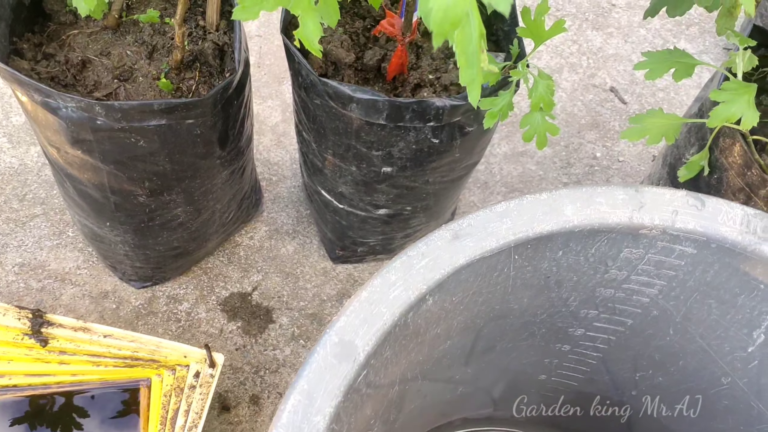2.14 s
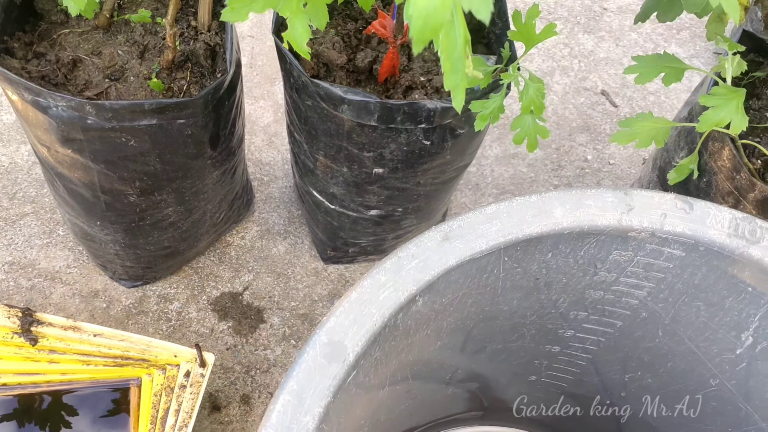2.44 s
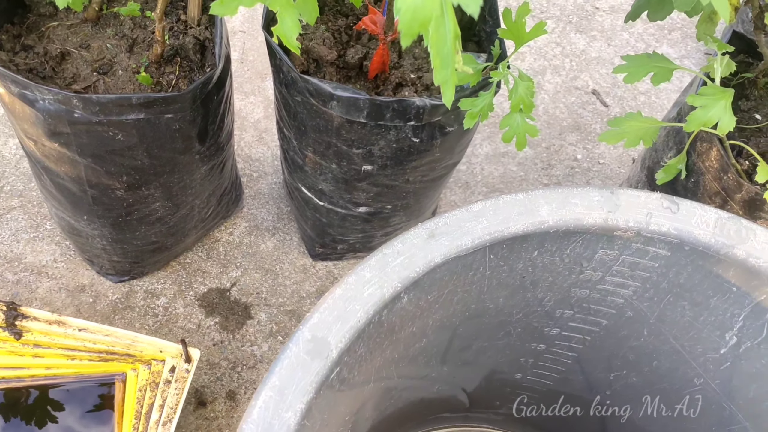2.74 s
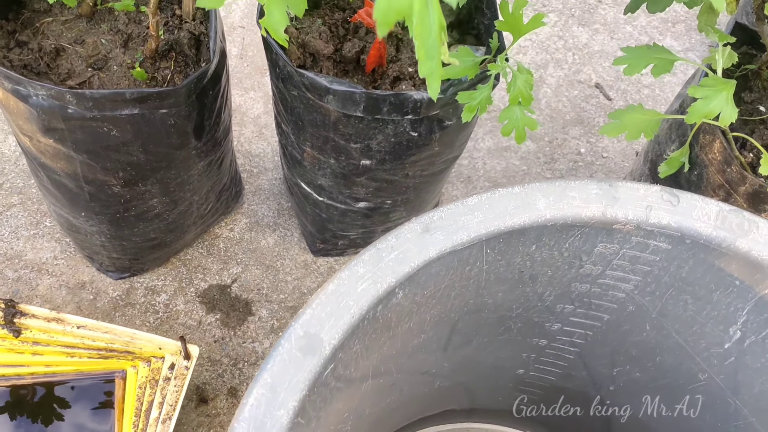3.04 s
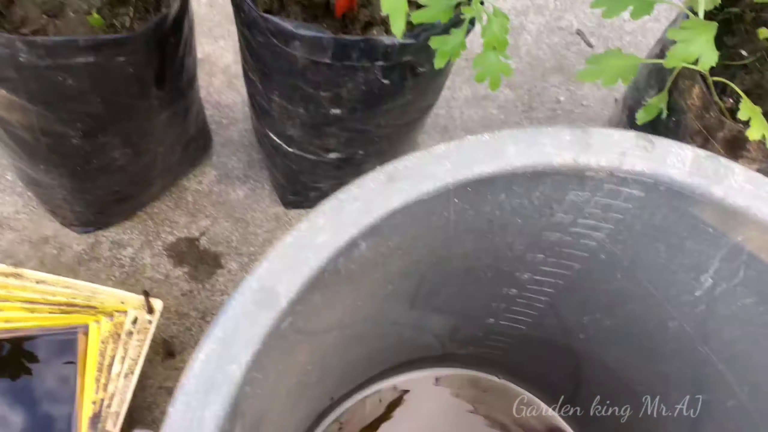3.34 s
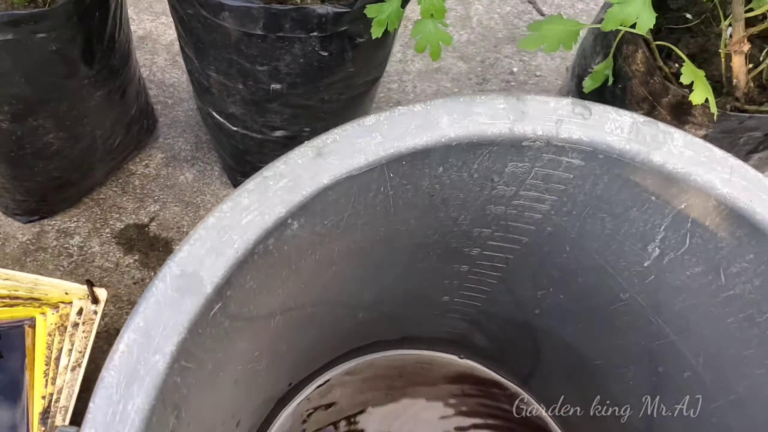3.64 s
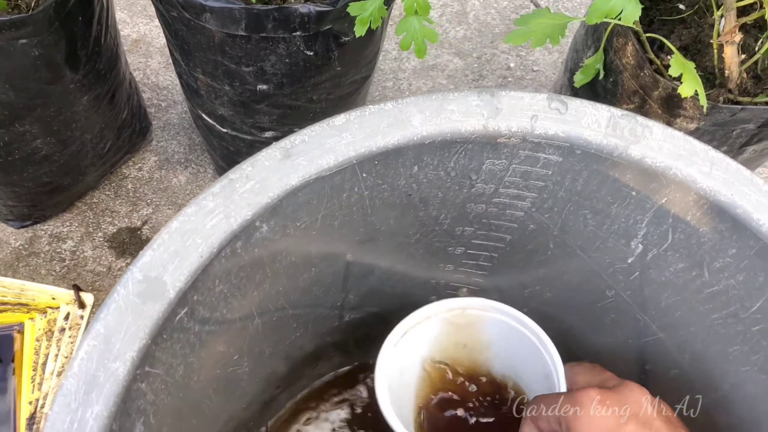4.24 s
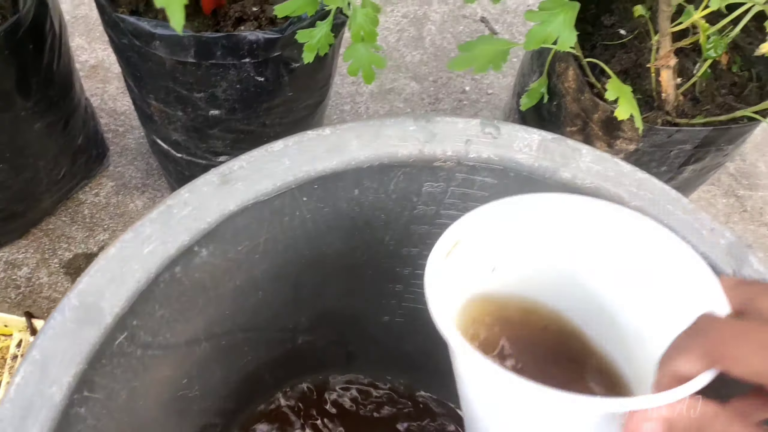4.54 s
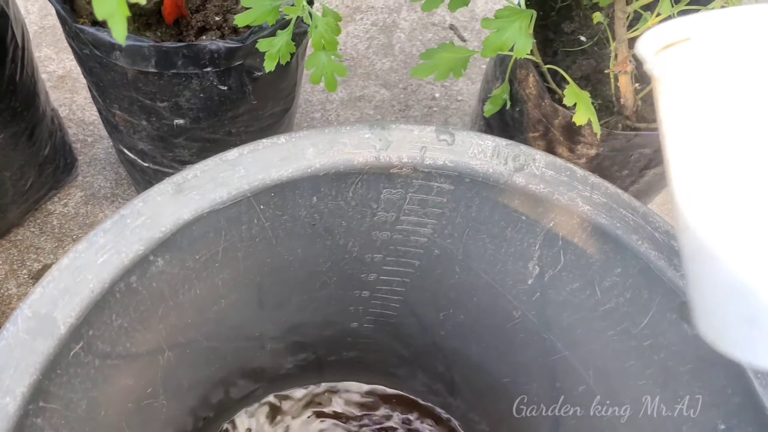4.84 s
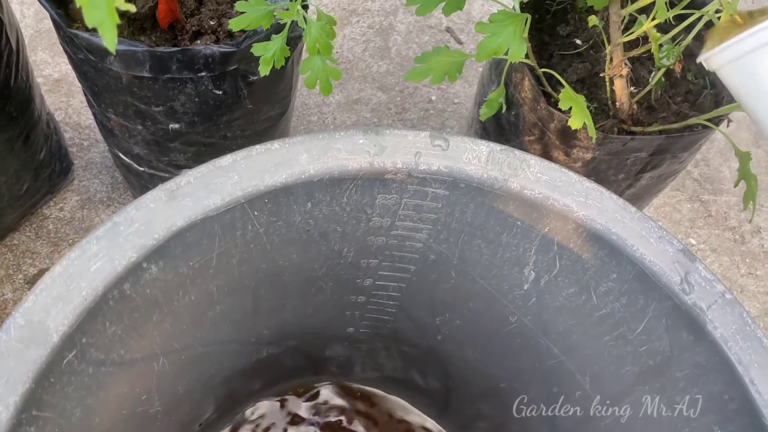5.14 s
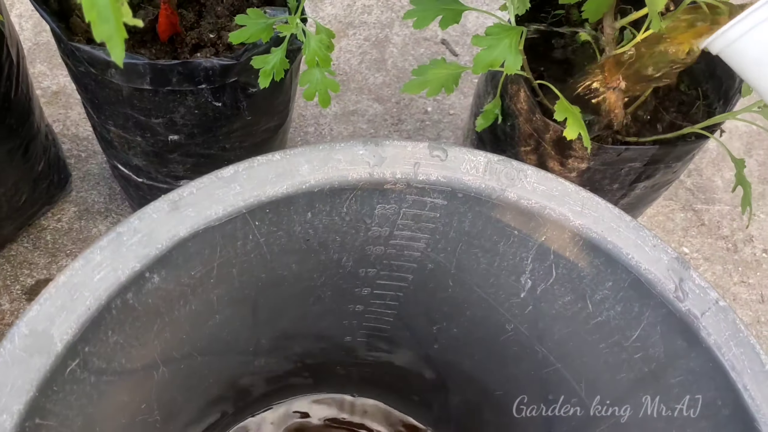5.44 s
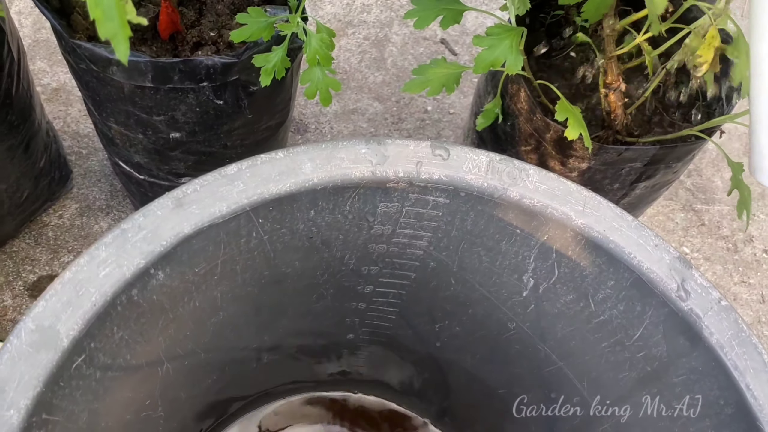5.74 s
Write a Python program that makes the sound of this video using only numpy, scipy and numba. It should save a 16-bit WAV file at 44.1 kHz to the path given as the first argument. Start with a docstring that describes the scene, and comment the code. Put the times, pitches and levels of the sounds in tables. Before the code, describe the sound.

In a quiet garden, close to the microphone, liquid splashes softly onto earth, a plastic cup rubs and taps a bucket, and a second little pour follows. Next comes the loudest part: the cup scoops in the metal bucket, knocking and sloshing with a low hollow boom, and drops fall back. A last fizzing pour hits the soil. Faint birds chirp and whistle in the background.

```python
"""Liquid plant feed is poured onto potted soil from a plastic cup, scooped out of a metal bucket.
Each short pour fizzes with tiny bursting bubbles while fat drops smack the earth. Between pours the cup
rubs, knocks and plunges in the bucket: the liquid sloshes, the metal booms and rings, and drips fall back.
Behind it all, birds whistle and chirp over the hush of a very quiet garden."""
import sys
import numpy as np
from scipy import signal
from scipy.fft import rfft, irfft
from scipy.io import wavfile
from scipy.ndimage import uniform_filter1d
from numba import njit

SR = 44100
rng = np.random.default_rng(int(sys.argv[2]) if len(sys.argv) > 2 else 0)


def persist_wave(psi):
    """Save psi, clipped to +-1, as 16-bit WAV."""
    counts = np.round(np.clip(psi, -1, 1) * 32767).astype(np.int16)
    wavfile.write(sys.argv[1], SR, np.atleast_2d(counts).T)


N = 254898
T = np.arange(N) / SR

# Tone curves say how strong the low and high parts of a sound are.
# Each row: frequency in Hz, level in dB. Levels in all tables are relative.
YARD_TONE = [(15, -31), (25, -10), (48, -8.5), (125, 1.5), (237, -9), (978, -17), (1540, -22), (3260, -25),
             (3630, -27.5), (4260, -28.5), (5280, -35), (9520, -30), (15000, -34.5)]
RUB_TONE = [(1200, -23), (1550, -11), (1750, -16), (1970, 1.5), (2500, -16), (3900, -2), (5500, -12.5),
            (7000, -9), (9000, -25)]
SLOSH_TONE = [(200, -30.5), (400, -23), (560, -10.5), (760, -8), (900, -11.5), (1260, -7.5), (1900, -10),
              (2300, -7), (2900, -7), (3700, -5), (5000, -12), (6000, -20), (9000, -36.5)]
SPRAY_TONE = [(3000, 2), (5500, -10.5), (8000, -6), (11000, -9), (15000, -5)]
RUMBLE_TONE = [(25, -28.5), (60, -22), (110, -9.5), (170, -1.5), (215, -1), (260, -7), (300, -3.5),
               (380, -21.5), (600, -46.5)]
SLAP_TONE = [(30, -41), (120, -25), (200, -19), (380, -16.5), (520, -2.5), (700, 1.5), (1200, -1),
             (1900, -6), (3400, -10.5), (4800, -21), (6000, -31.5), (15000, -54)]
SPATTER_TONE = [(800, -22.5), (2300, -2.5), (3500, 5.5), (5000, -3.5), (6000, -4.5), (8300, -4),
                (11000, -10.5), (15000, -13.5)]
SMACK_TONE = [(500, -44), (1200, -39.5), (2200, -15), (4000, -4), (8000, 0), (14000, 3.5)]
FIZZ_TONE = [(2060, -15), (3500, -12), (4460, -3.5), (5620, -4.5), (6050, 2), (8160, 5), (12000, 8),
             (14100, 14), (15000, 11), (15500, -51)]
PUDDLE_TONE = [(700, -14), (1400, -1), (1900, 6), (3200, 7), (4500, 12.5), (6000, 7.5), (9000, -12.5)]

# A small bird's chirps. Each row: start in seconds, level in dB.
CHIRPS = [(1.115, -54.5), (1.287, -54.5), (1.459, -54), (1.643, -57), (1.877, -63), (2.852, -66.5),
          (3.069, -55), (3.518, -51), (3.725, -48), (4.561, -51.5), (4.795, -55), (5.06, -63)]
# Far birds. Each row: start and length in seconds, first and last pitch in Hz, level in dB.
FAR_CALLS = [(0, 0.076, 622, 713, -58), (0.261, .18, 630, 728, -59), (0.711, .08, 503, 543, -62),
             (1.055, 0.076, 704, 619, -50.5), (1.072, .08, 937, 851, -58), (1.062, 0.094, 1540, 1462, -60),
             (2.46, .13, 1970, 1975, -60), (2.521, .18, 2424, 2405, -66), (2.51, .11, 3500, 3336, -63),
             (2.5, .08, 1038, 940, -66), (2.917, .28, 3280, 3290, -61), (3.215, 0.077, 3298, 3250, -50),
             (3.075, 0.034, 1036, 985, -61), (3.17, .14, 4680, 4780, -67), (4.635, .09, 1107, 1184, -49.5),
             (4.722, 0.079, 1680, 1617, -56.5), (4.937, .14, 701.4, 637.6, -56),
             (5.025, .06, 3290, 3270, -64), (5.073, .1, 1330, 1397, -57.5), (5.137, 0.095, 653, 708, -56),
             (5.24, .11, 1108, 1134, -50), (5.338, .07, 1702, 1590, -47.5), (5.22, .12, 1450, 1427, -58),
             (5.36, .13, 1427, 1404, -50), (5.32, .06, 3400, 3210, -65), (5.366, .22, 704, 713.3, -53),
             (5.677, 0.12, 1450, 1585, -52)]
# The notes of the bucket's air and walls. Each row: pitch in Hz, level in dB, ring time in seconds.
BUCKET_NOTES = [(208, -10, 0.12), (292, -11.5, 1), (586, 0.5, 0.23), (632, -4, .12), (752, 0.5, 0.097),
                (925, -6.5, 0.1), (1084, 1.5, .13), (1290, 0, .2), (1435, -4, 0.069), (1660, 1.5, 0.072),
                (2030, -18, .17), (2174, -5, 0.11), (2610, -8, 0.35), (2839, -13, .18), (3100, -12, 0.11),
                (3380, -7.5, .12), (3474, -7, .14), (3660, -5, 0.24)]
# The deep notes of its base. Each row: pitch in Hz, level in dB, ring and swell times in seconds.
BOOM_NOTES = [(216.9, 1.5, 0.12, 0.01), (304, -15, 0.11, .004), (122, -24.5, 0.12, .004)]
# Lone bubbles and drips. Each row: start in seconds, pitch in Hz, level in dB, ring time in seconds.
LONE_DRIPS = [(3.361, 2166, -18, .06), (3.385, 2130, -14, .035), (3.390, 1407, -19, 0.035),
              (3.603, 530, -5, 0.05), (3.622, 672, -8.5, 0.037), (4.444, 2490, -19.5, .011),
              (4.524, 1280, -13.5, 0.015), (4.524, 1890, -13.5, 0.005), (4.598, 2040, -38.5, .062),
              (4.654, 553, -19, 0.037), (4.649, 344, -34, 0.072), (4.735, 503, -28, 0.03),
              (4.779, 2950, -25, 0.018), (4.778, 5050, -42, .012)]
# Drops flung at the cup and bucket. Each row: start in seconds, level in dB, pitch in Hz.
FLUNG_DROPS = [(3.343, -8.5, 8740), (3.344, -10, 3520), (3.461, -23, 7450), (4.044, -8, 4870),
               (4.0445, -5, 9520), (4.089, -12, 11850), (4.418, -26, 4550), (4.472, -17, 12500),
               (4.524, -27, 3800)]
# The cup stirs. Each row: start and hold in seconds, then slosh, spray and rumble levels in dB.
CUP_STIRS = [(0.962, 0.07, -54, -78, -55), (3.287, 0.22, -31.5, -36, -43), (3.612, .06, -52, -66, -48),
             (4.015, 0.27, -26, -38.5, -35), (4.34, 0.049, -35.5, -38, -38)]
# The cup hits the bucket or the liquid. Each row: start in seconds, slap, spatter and boom levels
# in dB, pitch of the cup's hollow note in Hz, rise time in seconds.
CUP_HITS = [(0.958, -14.5, -62, -24, 760, .0015), (0.989, -22, -43, -53, 567, .001),
            (3.2785, -1.5, -17, -19, 677, .001), (3.284, -3, -19, -10, 601, 0.0011),
            (3.572, -21, -27, -46, 572, .022), (3.602, -5, -21, -32, 570, .004),
            (3.61, -7, -17, -23, 573, .002), (3.622, -14, -33, -20.5, 596, .0015),
            (3.936, -5.5, -19, -30, 571, .007), (3.952, -2.5, -14, -42, 700, .007),
            (3.968, -.5, -10.5, -21, 576, .005), (3.994, -3.5, -3.5, -10.5, 605, 0.0014),
            (4.003, -7, -9, -7, 556, 0.00083), (4.019, -4.5, -20, -9, 606, .001),
            (4.155, -10.5, -30, -16, 676, 0.01), (4.178, -10.5, -21, -29.5, 750, .008),
            (4.281, 0, -8.5, -24, 564, 0.0038), (4.311, -12, -25, -40, 779, 0.0014),
            (4.353, -9, -19.5, -17, 567, 0.0048)]
# Pours onto the soil. Each row: start and hold in seconds, level in dB.
SOIL_POURS = [(-.03, .08, -46), (.136, .29, -44), (1.928, 0.37, -41), (2.665, .02, -58), (5.455, .33, -38)]
# The stream thickens as the cup tips further. Each row: time in seconds, boost to the puddle in dB.
POUR_GUSHES = [(.305, 3), (2.105, 9), (2.28, 4), (5.53, 3.5), (5.62, 3)]
# The fattest drops on the soil. Each row: start in seconds, level in dB, pitch in Hz.
FAT_DROPS = [(0.158, -12, 8040), (0.173, -13.5, 7200), (0.2768, -22, 3980), (0.3125, -17, 3250),
             (0.346, -23, 3320), (0.3954, -20.5, 4050), (0.484, -22, 4630), (0.5261, -15, 8370),
             (0.634, -29, 4530), (1.9858, -16.5, 6170), (2.0167, -16, 6700), (2.028, -10.5, 8028),
             (2.074, -15, 2580), (2.087, -13, 9600), (2.0992, -14, 4460), (2.1106, -11, 10800),
             (2.2643, -15, 8050), (2.2733, -15, 8460), (2.3457, -16, 4070), (2.4182, -14, 12600),
             (2.4615, -19.5, 11000), (2.5217, -19, 5260), (5.467, -16.5, 7500), (5.4896, -8, 8040),
             (5.622, -17, 3240), (5.7153, -11.5, 7980), (5.7438, -18, 4100)]


def undb(db):
    """Turn decibels into a number to multiply by."""
    return 10 ** (np.asarray(db) / 20)


def unit(x):
    """Scale a sound to an average (rms) level of 1."""
    return x / np.sqrt(np.mean(x ** 2))


def add(out, start, x):
    """Mix x into out from start seconds on."""
    i = max(int(start * SR), 0)
    out[i:i + len(x)] += x[:max(N - i, 0)]


def colour(x, tone):
    """Filter a sound to follow a tone curve."""
    hz, db = np.transpose(tone)
    size = 4096
    log_hz = np.log(np.arange(size // 2 + 1) * SR / size + 1)
    log_gain = np.log(undb(np.interp(log_hz, np.log(hz), db)))
    cepstrum = irfft(log_gain)[:size // 2]  # keeping one half stops the filter from sounding early
    cepstrum[1:] *= 2
    return signal.fftconvolve(x, irfft(np.exp(rfft(cepstrum, size))))[:len(x)]


def envelope(start, hold, attack_s, fade_db_per_s, sag_db_per_s=0):
    """A loudness shape: it rises, stays or sags until hold seconds after the start, then fades."""
    t = np.maximum(T - start, 0)
    drop_db = sag_db_per_s * np.minimum(t, hold) + fade_db_per_s * np.maximum(t - hold, 0)
    return np.minimum(t / attack_s, 1) * undb(-drop_db)


def ring(hz, t60, glide=0, swell=1e-4):
    """A note that swells, then dies by 60 dB in t60 seconds while its pitch rises by the share glide."""
    t = np.arange(int(t60 * SR) + 2) / SR
    wave = np.sin(2 * np.pi * hz * (t + glide * t * t / (2 * t60)))
    return wave * np.exp(-np.log(1000) * t / t60) * (1 - np.exp(-t / swell))


@njit
def bubbles(start, hz, cycles, size, glide):
    """Each bubble is a short note that opens quickly, rises in pitch and dies."""
    out = np.zeros(N)
    for k in range(len(start)):
        n, phase = int(cycles[k] * SR / hz[k]) + 2, 0.
        for j in range(min(n, N - int(start[k]))):
            phase += 2 * np.pi * hz[k] * (1 + glide * j / n) / SR
            out[int(start[k]) + j] += size[k] * min(1., 10. * j / n) * np.exp(-6. * j / n) * np.sin(phase)
    return out


def grains(per_s, centre_hz, octaves, cycles, spread_db, glide):
    """An even flow of tiny random pops around one pitch, a few much louder than the rest."""
    when, pitch, length, size = rng.uniform(1e-4, 1, (int(per_s * N / SR), 4)).T
    hz = np.broadcast_to(centre_hz, N)[(when * N).astype(int)] * 2 ** (octaves * (pitch - .5))
    gain = undb(-spread_db * np.log(size.clip(.01)))
    pops = bubbles(when * N, np.minimum(hz, SR / 3), cycles * (.5 - np.log(length)), gain, float(glide))
    return pops / np.sqrt(np.abs(uniform_filter1d(pops * pops, size=2400)) + 1e-9)


def close_echoes(x, wet_db, t60):
    """Add very quick echoes from close walls; wet_db sets how loud they are."""
    t = T[:SR // 10]
    echoes = rng.standard_normal(len(t)) * np.exp(-np.log(1000) * t / t60) * (t > .001)
    return x + undb(wet_db) * signal.fftconvolve(x, echoes / np.sqrt(np.sum(echoes ** 2)))[:N]


def garden_echoes(x, wet_db, t60):
    """Add scattered echoes from walls and plants."""
    t = T[:SR]
    tail = rng.standard_normal(SR) * np.exp(-np.log(1000) * t / t60) * (1 - np.exp(-t / .034))
    tail = colour(tail, [(100, -2.5), (4500, -3), (14000, -2)])
    return x + undb(wet_db) * signal.fftconvolve(x, tail / np.sqrt(np.sum(tail ** 2)))[:N]


def yard():
    """The faint, low hush of the neighbourhood."""
    return unit(colour(rng.standard_normal(N), YARD_TONE)) * undb(-65.3)


def whistle(length, start_hz, end_hz, arch, waver):
    """One bird note: an arched, trembling slide in pitch with soft ends."""
    progress = np.linspace(0, 1, int(length * SR))
    tremble = unit(uniform_filter1d(rng.standard_normal(len(progress)), size=200))
    flutter = undb(3.6 * np.interp(progress, np.linspace(0, 1, 7), rng.standard_normal(7)))
    hump = np.sin(np.pi * progress)
    hz = (start_hz + (end_hz - start_hz) * progress) * (1 + arch * hump)
    hz += waver * (start_hz / 1500) ** .3 * tremble  # high notes tremble more
    return 1.41 * np.sin(2 * np.pi * np.cumsum(hz) / SR) * flutter * np.abs(hump) ** .35


def birds():
    """Rising chirps from nearby bushes and hoarse calls from further off, blurred by echoes."""
    near, far = np.zeros(N), np.zeros(N)
    for (start, db), shift in zip(CHIRPS, 1 + .014 * rng.standard_normal(len(CHIRPS))):
        add(near, start, undb(db) * whistle(.028, 4040 * shift, 4370 * shift, arch=.024, waver=45))
    for start, length, start_hz, end_hz, db in FAR_CALLS:
        add(far, start, undb(db + 1) * whistle(length, start_hz, end_hz, arch=.004, waver=36))
    return garden_echoes(near, wet_db=-5.5, t60=.27) + garden_echoes(far, wet_db=-.5, t60=.36)


def cup_rub():
    """Plastic scrapes briefly on the metal wall before the first knock."""
    rub = grains(per_s=2500, centre_hz=3400, octaves=2.76, cycles=9.2, spread_db=1, glide=0)
    shape = envelope(start=.8775, hold=.072, attack_s=.021, fade_db_per_s=900)
    return unit(colour(rub, RUB_TONE)) * undb(-50.5) * shape


def bucket_ring(x, wet_db):
    """A sound inside the bucket sets its air and walls ringing."""
    notes = np.zeros(N)
    for hz, db, t60 in BUCKET_NOTES:
        add(notes, 0, undb(db) * ring(hz, t60))
    return x + undb(wet_db) * signal.fftconvolve(x, notes)[:N]


def smacks(drops, crack_db, note_db, crack_s, cycles):
    """Each landing drop gives a bright crack and a very short note of trapped air."""
    out, t = np.zeros(N), T[:SR // 40]
    crack_shape = np.exp(-t / crack_s) * (1 - np.exp(-t / .00032))
    for start, db, hz in drops:
        crack = unit(colour(rng.standard_normal(len(t)), SMACK_TONE)) * crack_shape
        add(out, start, undb(db + crack_db) * crack)
        add(out, start, undb(db + note_db) * ring(hz, cycles / hz, glide=.018, swell=.0004))
    return out


def drips():
    """Lone bubbles ring and rise in pitch as they surface; flung drops tick on the walls."""
    plinks = np.zeros(N)
    for start, hz, db, t60 in LONE_DRIPS:
        add(plinks, start, undb(db) * ring(hz, t60, glide=.17, swell=3.8 / hz))  # opens in a few cycles
    ticks = smacks(FLUNG_DROPS, crack_db=-7.5, note_db=0, crack_s=.0014, cycles=34)
    return close_echoes(bucket_ring(plinks, wet_db=-56), wet_db=0, t60=.088) + ticks


def sloshing():
    """The cup stirs up gurgling bubbles, fine spray and the rumble of rocked liquid."""
    # Bubble size wanders as the liquid folds over itself; bigger bubbles are lower and louder.
    wander = unit(uniform_filter1d(uniform_filter1d(rng.standard_normal(N), size=1300), size=1300))
    gurgle_hz = 1700 * 2 ** (.247 * wander)
    gurgle = grains(per_s=2400, centre_hz=gurgle_hz, octaves=3.7, cycles=13, spread_db=3, glide=.1)
    gurgle = bucket_ring(colour(gurgle, SLOSH_TONE), wet_db=-53)
    slosh = undb(1.5 - 1.8 * wander) * unit(close_echoes(gurgle, wet_db=-5, t60=.042))
    droplets = grains(per_s=1900, centre_hz=8040, octaves=2.3, cycles=9.4, spread_db=3.5, glide=.1)
    mist = undb(-4) * rng.standard_normal(N)  # drops too fine to tell apart
    spray = undb(3) * unit(close_echoes(colour(droplets + mist, SPRAY_TONE), wet_db=-3, t60=.037))
    rumble = undb(5) * unit(bucket_ring(colour(rng.standard_normal(N), RUMBLE_TONE), wet_db=-54.5))
    out = np.zeros(N)
    for start, hold, slosh_db, spray_db, rumble_db in CUP_STIRS:
        stir = envelope(start, hold, attack_s=.07, fade_db_per_s=330.5)
        lapping = undb(-22) * envelope(start, hold, attack_s=.07, fade_db_per_s=120)
        splash = envelope(start, hold, attack_s=.014, fade_db_per_s=185, sag_db_per_s=30)
        rocking = envelope(start, hold, attack_s=.039, fade_db_per_s=131)
        out += slosh * undb(slosh_db) * (stir + lapping)
        out += spray * undb(spray_db) * splash
        out += rumble * undb(rumble_db) * rocking
    return out


def cup_hits():
    """Each hit makes a wet slap, bright spatter, a hollow note from the cup and a swelling boom."""
    slaps, notes = np.zeros(N), np.zeros(N)
    t = T[:SR // 6]
    for start, slap_db, spatter_db, boom_db, hollow_hz, rise in CUP_HITS:
        slap = undb(slap_db - 10.5) * unit(colour(rng.standard_normal(len(t)), SLAP_TONE))
        spatter = undb(spatter_db - 11) * unit(colour(rng.standard_normal(len(t)), SPATTER_TONE))
        onset, since_peak = np.minimum(t / rise, 1), np.maximum(t - rise, 0)
        push = onset * np.exp(-since_peak / .0062)
        settle = onset * np.exp(-since_peak / .045)  # thrown liquid falls back
        add(slaps, start, slap * (push + .13 * settle) + spatter * (push + .075 * settle))
        hollow_db = min(slap_db - 5.5, -9.5)  # the small cup can only ring so loud
        add(notes, start, undb(hollow_db) * ring(hollow_hz, t60=.081, glide=.073, swell=rise))
        for hz, db, t60, swell in BOOM_NOTES:
            add(notes, start, undb(boom_db + db + 6.5) * ring(hz, t60, swell=swell))
    return close_echoes(bucket_ring(slaps, wet_db=-57), wet_db=-11, t60=.086) + notes


def patter(flow):
    """Smaller drops land at random, louder when the stream is stronger; rows as in FAT_DROPS."""
    when = rng.uniform(0, T[-1], size=130)
    size, pitch = rng.standard_normal((len(when), 2)).T
    flow_db = 20 * np.log10(np.interp(when, T, flow) + 1e-9)
    hz = 6000 * 2 ** (.48 * np.clip(pitch, -2, 2))
    return zip(when, flow_db + 14 + 2.5 * size, hz)


def pour_level(attack_s, fade_db_per_s):
    """The rise and fall of all the pours together."""
    return sum(undb(db) * envelope(start, hold, attack_s, fade_db_per_s) for start, hold, db in SOIL_POURS)


def pouring():
    """The stream breaks into tiny clicks on the earth, bubbles burst in the puddle and fat drops smack."""
    dribble_level, dry_level = undb(-53), undb(-70)  # a thinning stream breaks up, then runs dry
    gush_db = sum(db * np.exp(-.5 * ((T - when) / .033) ** 2) for when, db in POUR_GUSHES)
    flow = undb(.3 * gush_db) * pour_level(attack_s=.022, fade_db_per_s=66)
    flow *= flow / (flow + dry_level)
    fill = undb(gush_db - 5) * pour_level(attack_s=.08, fade_db_per_s=82)
    puddle_hz = 4350 / (1 + fill / undb(-33.5))  # deeper as the puddle fills
    fizz = grains(per_s=3300, centre_hz=7170, octaves=2.04, cycles=8.5, spread_db=4.5, glide=.082)
    puddle = grains(per_s=1600, centre_hz=puddle_hz, octaves=1.1, cycles=22, spread_db=2.7, glide=.062)
    dribble = grains(per_s=400, centre_hz=6400, octaves=2.1, cycles=45, spread_db=4.5, glide=.06)
    drip_share = 1 / (1 + (flow / dribble_level) ** 2)
    stream = undb(-2.5) * unit(colour(fizz, FIZZ_TONE)) * np.sqrt(1 - drip_share)
    stream += undb(-4) * unit(colour(dribble, FIZZ_TONE)) * np.sqrt(drip_share)
    out = stream * flow + unit(colour(puddle, PUDDLE_TONE)) * fill
    out += smacks([*FAT_DROPS, *patter(flow)], crack_db=-7, note_db=-4, crack_s=.0012, cycles=33.4)
    return close_echoes(out, wet_db=-7, t60=.03)


def scene():
    """Pots, cup and bucket at arm's length, with birds beyond, in one channel."""
    close = pouring() + cup_rub() + sloshing() + cup_hits() + drips()
    return (garden_echoes(close, wet_db=-21.5, t60=.37) + birds() + yard())[None]


def record(dry):
    """The phone clips peaks at full scale and cuts the treble above 14850 Hz."""
    low_pass = signal.ellip(10, .2, 80, 14850, fs=SR, output="sos")
    return signal.sosfilt(low_pass, np.clip(dry, -1, 1))


dry = scene()
out = record(dry)
persist_wave(out)
```